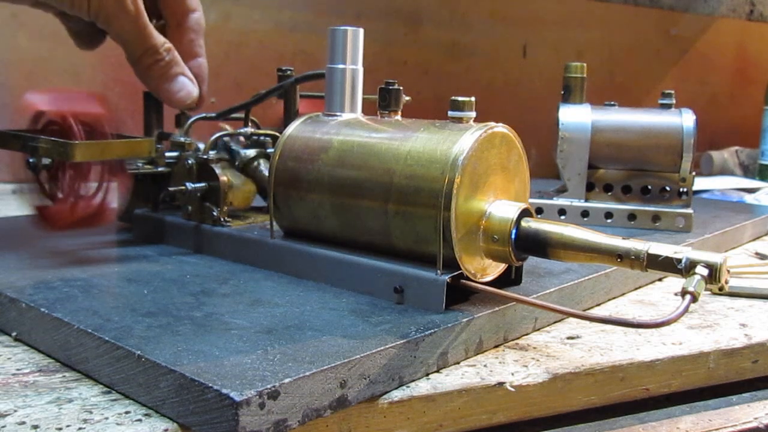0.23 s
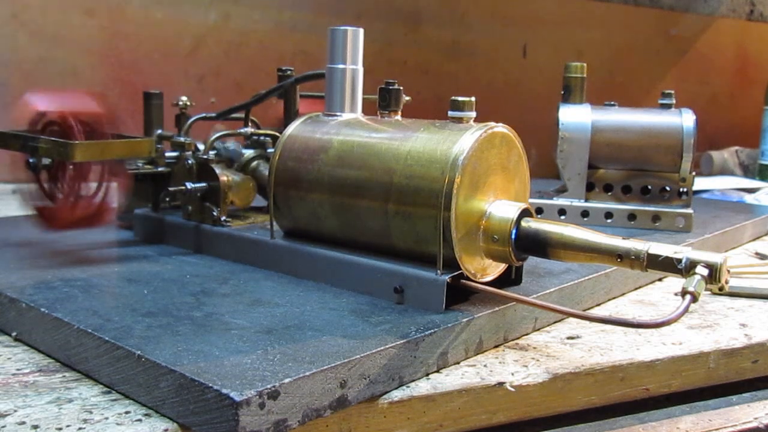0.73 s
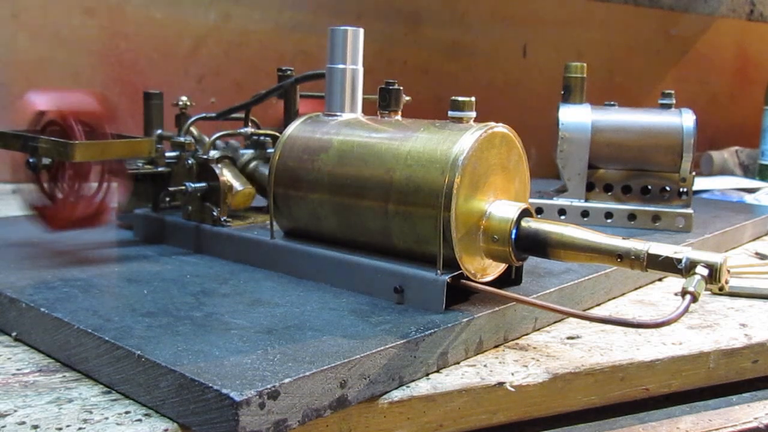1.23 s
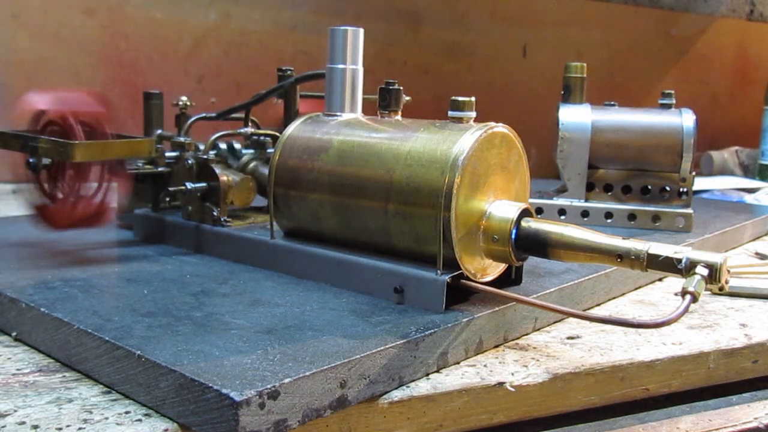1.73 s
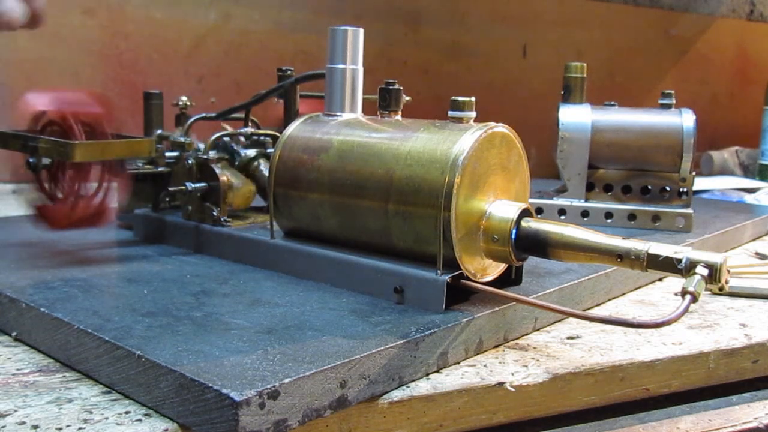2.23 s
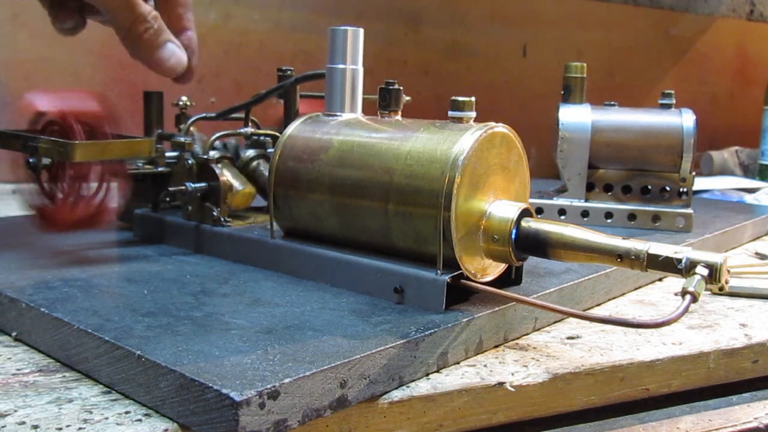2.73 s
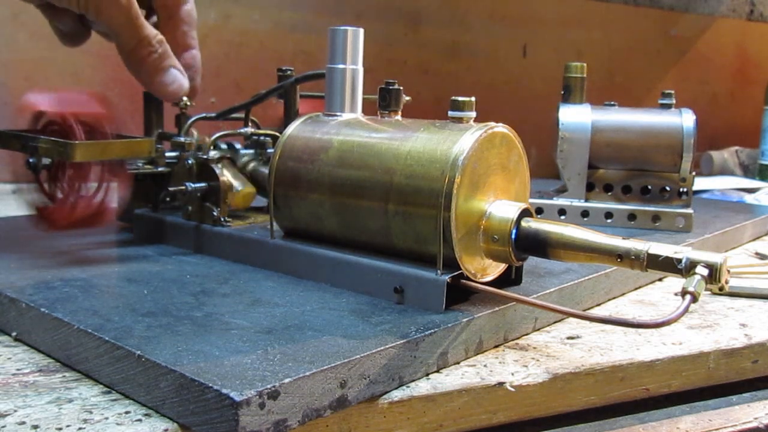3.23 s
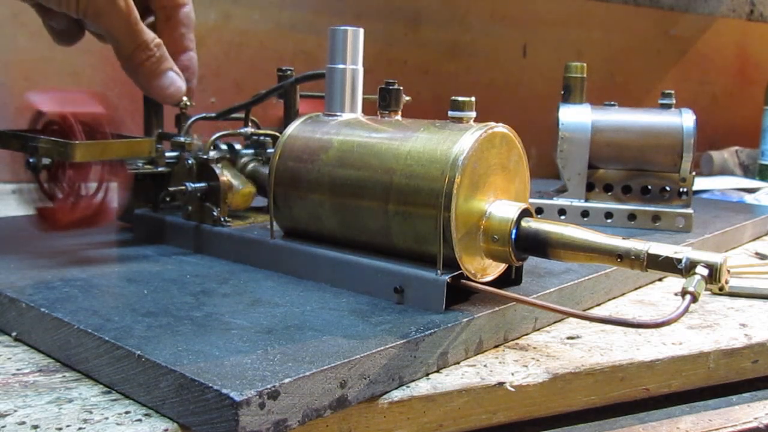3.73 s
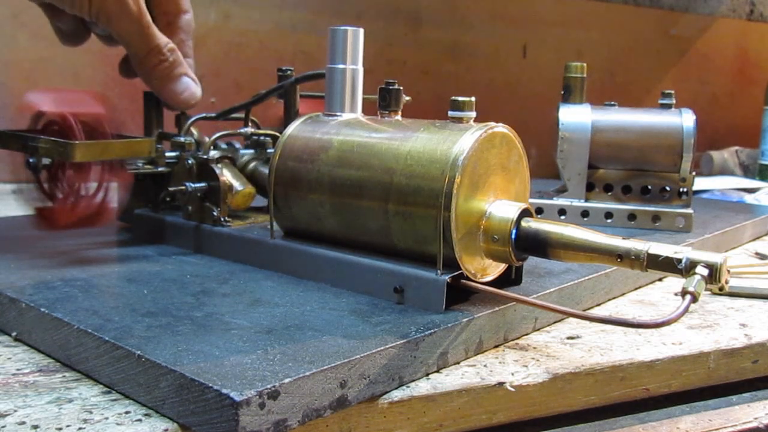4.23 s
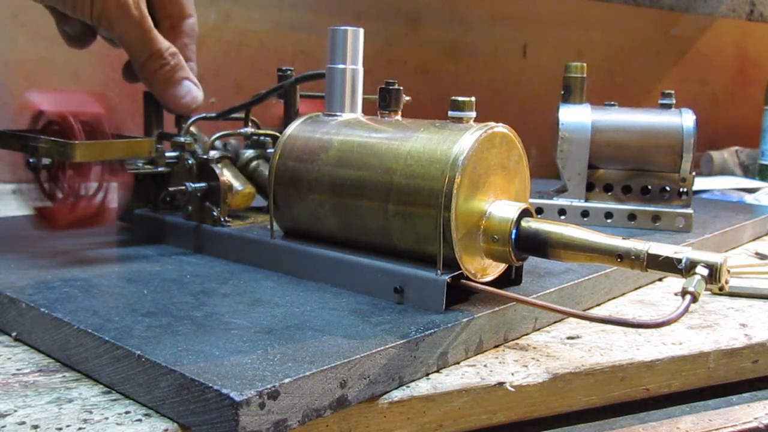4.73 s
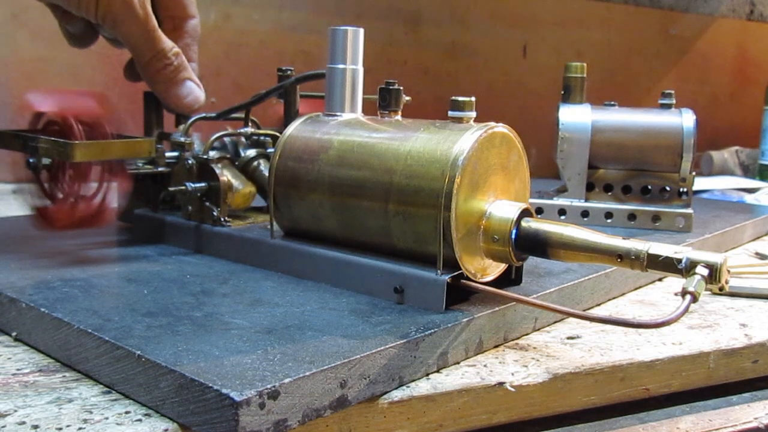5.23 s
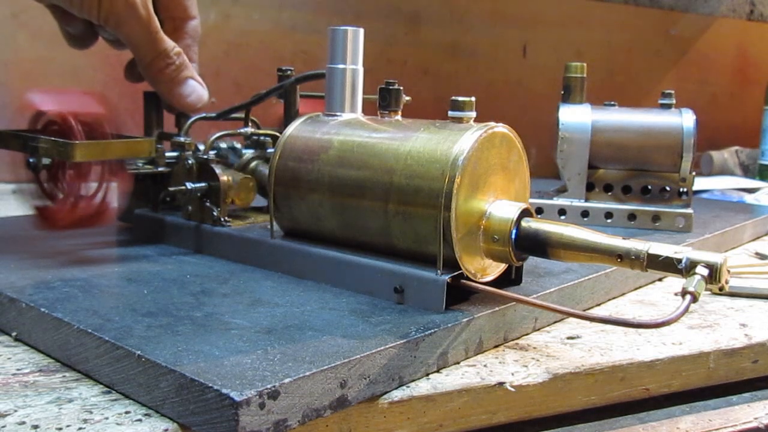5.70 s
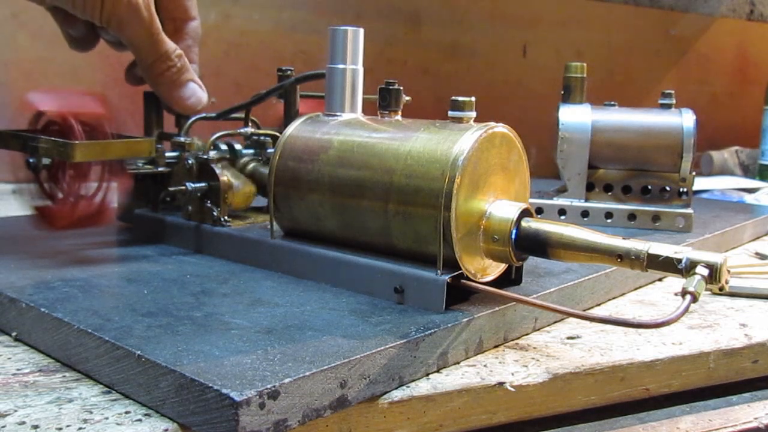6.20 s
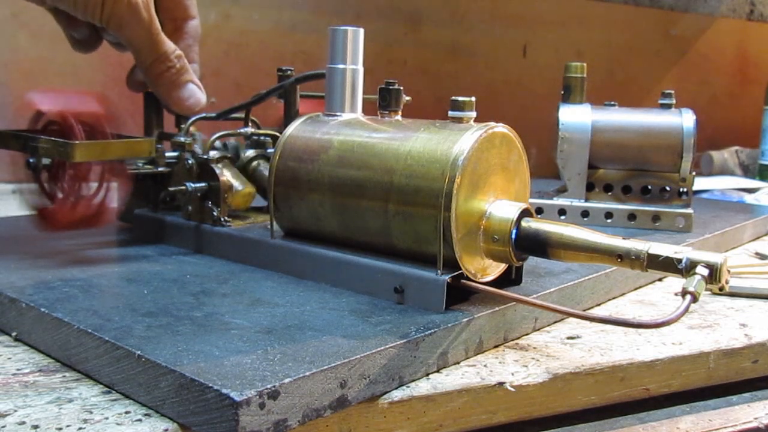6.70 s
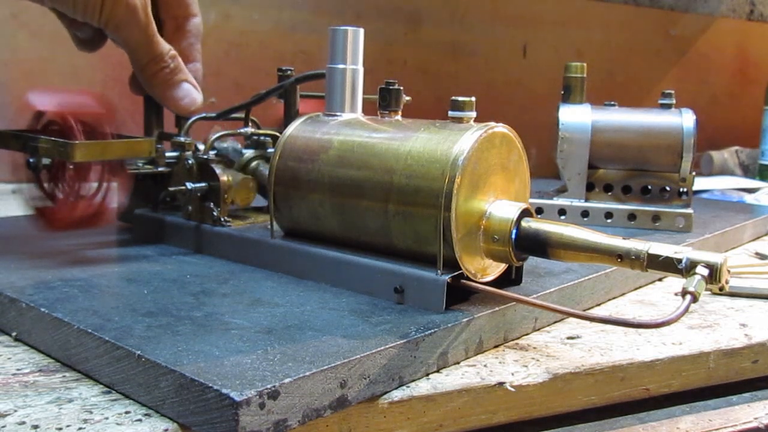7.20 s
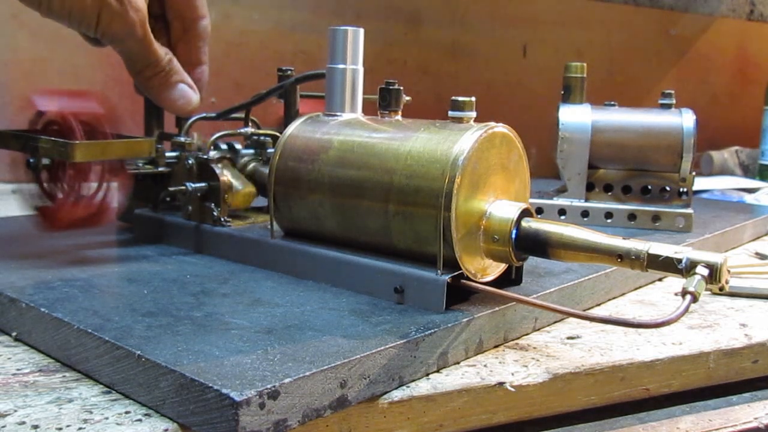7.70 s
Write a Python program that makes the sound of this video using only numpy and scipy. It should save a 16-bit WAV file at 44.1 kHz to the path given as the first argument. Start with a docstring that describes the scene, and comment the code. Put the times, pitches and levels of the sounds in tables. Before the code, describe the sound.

Heard close in a workshop, a gas burner rushes with a faint whistling tone while a miniature steam engine knocks lightly and rapidly. Sharp, high metal ticks soon replace the knocking, and the flame turns suddenly quieter as the microphone level dips. The ticking stays even but slowly loses speed, joined by soft rhythmic steam hiss, a low drone and occasional ringing taps on the metal.

```python
"""A small model steam engine runs on a workbench beside its gas burner. Once a turn a loose metal part
in the gear ticks twice, first lightly and, once the engine is loaded, hard. The linkage knocks, mostly
before the load, and odd taps ring the frame. Steam leaks in time with the crank; the flame roars in its
tube over a low drone of bench and room. The first hard tick trips the microphone's gain control."""
import sys
import numpy as np
from scipy import signal
from scipy.fft import rfft, irfft
from scipy.io import wavfile
from scipy.ndimage import uniform_filter1d

SR = 44100
rng = np.random.default_rng(int(sys.argv[2]) if len(sys.argv) > 2 else 0)


def waveform_to_disk(signal):
    """Save audio, clipped to [-1, 1], as 16-bit WAV at the path in sys.argv[1]."""
    frames = np.transpose(np.atleast_2d(signal))
    scaled = np.clip(frames, -1, 1) * 32767
    samples = np.round(scaled).astype(np.int16)
    wavfile.write(sys.argv[1], SR, samples)


N = 350584

# Each row: time in seconds, crank speed in turns per second.
CRANK_SPEED = [(0, 9.795), (.45, 9.759), (.86, 9.433), (.92, 8.947), (1.26, 8.701), (1.6, 8.62),
               (1.85, 8.802), (2.37, 8.624), (2.37, 8.223), (3.35, 8.491), (3.72, 7.81), (4.14, 7.733),
               (5.54, 7.776), (6.26, 7.379), (6.66, 7.47), (6.77, 7.079), (7.51, 7.346), (7.95, 7.25)]


def crank_turns():
    """Crank angle at every sample; the engine slows under load."""
    start_turns = -.3925
    return start_turns + np.cumsum(curve(CRANK_SPEED, np.arange(N) / SR)) / SR


# Each row: time in seconds, level of the light tick in dB.
LIGHT_TICK_LEVEL = [(0, -22), (.45, -23.5), (.55, -44), (.65, -23), (.8, -22.5), (1.0, -28), (1.5, -20),
                    (2.3, -19.5), (3.0, -20), (3.3, -26), (3.7, -25.5), (5.0, -21.5), (7.05, -26),
                    (7.25, -40), (7.5, -37), (7.7, -23)]
# Extra bounce between the two ticks. Each row: start in seconds, level in dB.
BOUNCES = [(4.9753, -20)]


def loose_part():
    """The part lifts lightly at each whole turn; under load it lands hard, harder at higher speed."""
    landing_turns, loaded_s = .121, .85
    turns, t = crank_turns(), np.arange(N) / SR
    whole = np.arange(int(turns[-1]) + 1)
    lift_scatter, land_scatter = np.clip(rng.standard_normal((len(whole), 2)), -2, 2).T
    lift_s = np.interp(whole, turns, t)
    land_s = np.interp(whole + landing_turns, turns, t)
    lift_db = curve(LIGHT_TICK_LEVEL, lift_s) + 0.5 * lift_scatter
    land_db = -11 + 0.6 * (curve(CRANK_SPEED, land_s) - 8) + 1.64 * land_scatter
    lifts = np.c_[lift_s, lift_db]
    landings = np.c_[land_s, land_db][land_s > loaded_s]
    light = ticks(np.r_[lifts, BOUNCES], tilt_db_per_oct=-34, spread_db=2.2, rise_s=0.0002)
    hard = ticks(landings, tilt_db_per_oct=6.0, spread_db=1.9, rise_s=0.00033)
    return light + hard


# Each row: frequency in Hz, level in dB, T60 in seconds, left minus right in dB.
PART_MODES = [(4380, -16, 0.013, 4.5), (5230, -12, 0.008, 4), (5820, -12, 0.019, 1), (6290, -18, 0.026, 0),
              (7720, -14.5, 0.038, 1.5), (8300, -15.5, 0.019, 1.2), (8970, -12.5, 0.031, 0),
              (9394, 1, 0.0089, 2), (9534, -3, 0.011, 3.5), (11008, 0.5, 0.026, 3.5),
              (11660, -5.5, 0.013, 3), (13060, -9, 0.017, -1.5), (13360, -14, 0.011, 3),
              (14600, -22, .008, 4), (15980, -17, .016, 13)]


def ticks(hits, tilt_db_per_oct, spread_db, rise_s):
    """Each hit rings the part's modes a little differently; the tilt acts above 11 kHz."""
    hz, mode_db, t60_s, pan_db = np.transpose(PART_MODES)
    t, out = np.arange(2500) / SR, np.zeros((2, N))
    scatter = rng.standard_normal((len(hits), 3, len(hz)))
    envelope = gain_of(-60 * t / t60_s[:, None]) * (1 - np.exp(-t / rise_s)) ** 2
    tilt_db = tilt_db_per_oct * np.maximum(np.log2(hz / 11000), 0)
    for (start_s, hit_db), (strength, detune, lag) in zip(hits, scatter):
        level_db = hit_db + mode_db + spread_db * strength + tilt_db
        phase_rad = 2 * np.pi * (hz * (1 + .0015 * detune))[:, None] * t
        # Each mode reaches the two microphone ports out of step.
        lead_rad = np.multiply.outer([.5, -.5], 0.36 + 0.29 * lag)
        rings = envelope * np.sin(phase_rad + lead_rad[:, :, None])
        add(out, start_s, np.einsum("cm,cmt->ct", pan_gains(pan_db) * gain_of(level_db), rings))
    return out


# Each row: start in seconds, level in dB, crack relative to ring in dB.
LINKAGE_HITS = [(.014, -22.5, -10), (.116, -21.5, -6), (.218, -22.5, -6), (0.321, -23.5, -8),
                (0.424, -21, -6), (.526, -22, -12), (.626, -19.5, -12), (0.731, -17.5, -12),
                (0.845, -27, -21), (5.089, -22, -24)]
# Each row: frequency in Hz, width in Hz, level in dB, left minus right in dB.
LINKAGE_MODES = [(1290, 68, -4.5, -4), (1638, 104, 2.5, -1), (2020, 190, -4, -5), (3110, 150, -11, -13),
                 (3490, 85, -11, 9), (4150, 170, -12.5, 8), (5900, 510, -20, 1), (7490, 260, -4, 1)]


def linkage_knocks():
    """The linkage knocks once a turn while the engine runs free, and once more later."""
    return knocks(LINKAGE_HITS, LINKAGE_MODES)


# Each row: start in seconds, level in dB, crack relative to ring in dB.
FRAME_HITS = [(.787, -27, -29), (.828, -31.5, -1.5), (.928, -25.5, -3.5), (2.032, -29, -14.5),
              (2.093, -19, -12), (6.369, -10.5, -16), (7.859, -28, -5), (7.880, -25, -19.5),
              (7.9012, -19, -14), (7.9045, -3, -16)]
# Each row: frequency in Hz, width in Hz, level in dB, left minus right in dB.
FRAME_MODES = [(1250, 250, -12, 6), (1310, 280, 0.5, -12), (2650, 240, -1.5, -4), (4370, 280, -6, 2),
               (5760, 250, -17, -1), (7070, 240, -12, 6), (9750, 240, -4, 1), (11140, 250, -12, -11)]


def frame_taps():
    """Odd taps and clicks ring the frame."""
    return knocks(FRAME_HITS, FRAME_MODES)


def knocks(hits, modes):
    """Each hit rings damped modes under a short bright crack."""
    hz, width_hz, mode_db, pan_db = np.transpose(modes)
    rise_s, crack_t60_s = 0.0005, 0.017
    t, out = np.arange(1500) / SR, np.zeros((2, N))
    rings = np.exp(-np.pi * width_hz[:, None] * t) * np.sin(2 * np.pi * hz[:, None] * t)
    rings *= (1 - np.exp(-t / rise_s)) ** 2
    scatters_db = 3.1 * rng.standard_normal((len(hits), len(hz)))
    bursts = rng.standard_normal((len(hits), 2, len(t))) * gain_of(-60 * t / crack_t60_s)
    cracks = signal.sosfilt(signal.butter(3, [5500, 11500], "band", fs=SR, output="sos"), bursts)
    for (start_s, hit_db, crack_db), scatter_db, crack in zip(hits, scatters_db, cracks):
        body = (pan_gains(pan_db) * gain_of(mode_db + scatter_db)) @ rings
        crack = crack + 2.4 * crack.mean(0)  # mostly common to both channels
        add(out, start_s, gain_of(hit_db) * (body / abs(body).max() + gain_of(crack_db) * crack))
    return out


# Each row: frequency in Hz, relative spectral density in dB.
STEAM_SPECTRUM = [(3000, -18.5), (5000, -9), (8000, -5.5), (10000, -1.5), (10650, 1), (11800, -2),
                  (13000, -8), (14000, -8), (15500, -19), (17000, -25)]
# Each row: crank angle after the light tick in turns, relative leak level in dB.
STEAM_STROKE = [(0, -1), (.12, 2), (.25, -2), (.45, 0.5), (.6, -4), (.72, -31), (.95, -6), (1, -6)]


def steam_leak():
    """A bright leak opens and shuts with the crank, each stroke a little different."""
    def spectrum(hz):
        return gain_of(log_curve(STEAM_SPECTRUM, hz)) * pan_gains(1.0)[:, None]

    turns = crank_turns() + 1
    whole = np.arange(int(turns[-1]) + 2)
    scatter_db = np.interp(turns, whole, 1.8 * rng.standard_normal(len(whole)))
    level_db = -38 + curve(STEAM_STROKE, turns % 1) + scatter_db
    leak = shaped_noise(spectrum, fft_size=256, patch_bins=8, patch_frames=10, patch_db=4.1)
    return gain_of(level_db + 1.7 * flutter(cutoff_hz=200)) * leak


# Steady roar and drone as heard, including sudden dips like a gain being turned down.
# Each row: time in seconds, level in dB.
STEADY_NOISE_LEVEL = [(0, -30), (0.82, -31), (1.0, -28.5), (2.16, -29.5), (2.74, -28), (3.19, -30),
                      (4.35, -30), (5.7, -29), (5.78, -32), (6.07, -31), (6.44, -30), (7.55, -30.5),
                      (7.82, -32.5), (7.95, -34.5)]
# Resonances of the burner tube, then of bench and room.
# Each row: frequency in Hz, width in Hz, relative level in dB, left minus right in dB.
TUBE_MODES = [(1054, 107, -6.5, -0.5), (1147, 70, -8, -1.5), (1224, 42, -5.5, 3.5), (1326, 81, 0.5, -.5),
              (1458, 165, -10, -2.5), (1696, 63, -12, -2), (2346, 220, -14.5, -3), (2627, 77, -9, -6.5),
              (2760, 72, -6, -3.5), (2894, 238, -9, -6), (3130, 340, -20, 4.5), (4410, 210, -22, 4),
              (6050, 150, -15, 2), (7410, 360, -18.5, 0), (8140, 210, -24, 1)]
DRONE_MODES = [(55.7, 11, -22.5, -1), (74.5, 8.6, -22, -3), (112.6, 19, -21, 0.5),
               (183.6, 24.5, -20.5, -0.5), (229, 14, -19, 2.5), (360, 15, -22.5, -2.5),
               (568, 33, -21.5, -1)]
# Broad noise under the resonances. Each row: frequency in Hz, relative level in dB.
ROAR_FLOOR = [(20, -26.5), (60, -30.5), (200, -30.5), (450, -25), (750, -19), (2000, -22), (3800, -28),
              (5200, -28), (9000, -23), (12000, -26), (15000, -43), (17000, -50)]


def burner():
    """Turbulent, fluttering flame noise resonates in the tube, over the drone of bench and room."""
    def spectrum(hz):
        power = gain_of(log_curve(ROAR_FLOOR, hz)) ** 2 * np.ones((2, 1))
        for mode_hz, width_hz, mode_db, pan_db in TUBE_MODES + DRONE_MODES:
            falloff = 1 + (2 * (hz - mode_hz) / width_hz) ** 2 / 1.74
            power += (gain_of(mode_db) * pan_gains(pan_db)[:, None] / falloff) ** 2
        return np.sqrt(power)

    level_db = curve(STEADY_NOISE_LEVEL, np.arange(N) / SR) + 0.78 * flutter(cutoff_hz=56.7)
    roar = shaped_noise(spectrum, fft_size=4096, patch_bins=24, patch_frames=4, patch_db=1.22)
    return gain_of(level_db) * roar


def room_echo(sound):
    """Sparse workshop reflections of random sign die away quickly."""
    size, step, t60_s = SR // 4, 20, 0.066
    grid = np.arange(150, size - step, step)
    delays = grid + rng.integers(0, step, (2, len(grid)))
    response = np.zeros((2, size))
    np.put_along_axis(response, delays, rng.choice([-1., 1.], delays.shape), 1)
    response *= gain_of(-60 * np.arange(size) / SR / t60_s)
    return signal.fftconvolve(sound, response / np.linalg.norm(response[0]), axes=1)[:, :N]


# Each row: frequency in Hz, left-right correlation of the noise.
COHERENCE = [(60, 0.88), (130, 0.8), (290, 0.85), (640, 0.91), (1410, 0.94), (3100, 0.67), (6820, 0.53),
             (15000, 0.63)]


def shaped_noise(spectrum, fft_size, patch_bins, patch_frames, patch_db):
    """Stereo noise at rms 1; time-frequency patches swell and fade at random."""
    hop = fft_size // 4
    frames, hz = N // hop + 5, np.fft.rfftfreq(fft_size, 1 / SR)
    left_re, left_im, other_re, other_im, patches = rng.standard_normal((frames, len(hz), 5)).T
    patches = uniform_filter1d(patches, patch_bins, axis=0)
    patches = unit_rms(uniform_filter1d(patches, patch_frames, axis=1))
    coherence = log_curve(COHERENCE, hz)[:, None]
    left = left_re + 1j * left_im
    right = coherence * left + np.sqrt(1 - coherence ** 2) * (other_re + 1j * other_im)
    spectra = np.array([left, right]) * spectrum(hz)[:, :, None] * gain_of(patch_db * patches)
    return unit_rms(signal.istft(spectra, nperseg=fft_size, noverlap=fft_size - hop)[1][:, :N])


def flutter(cutoff_hz):
    """Low-passed noise at rms 1."""
    rolloff = 1 + (np.fft.rfftfreq(N, 1 / SR) / cutoff_hz) ** 4
    return unit_rms(irfft(rfft(rng.standard_normal(N)) / rolloff, N))


def gain_of(db):
    """Decibels to amplitude."""
    return 10 ** (np.asarray(db) / 20)


def pan_gains(pan_db):
    """Left and right gains for a level difference."""
    return gain_of(np.multiply.outer([.5, -.5], pan_db))


def unit_rms(x):
    """Scales to rms 1."""
    return x / np.sqrt(np.mean(x ** 2) + 1e-20)


def curve(table, x):
    """Interpolates a table linearly."""
    return np.interp(x, *np.transpose(table))


def log_curve(table, hz):
    """Interpolates a table over log frequency."""
    table_hz, values = np.transpose(table)
    return np.interp(np.log(hz + 1), np.log(table_hz + 1), values)


def add(mix, start_s, sound):
    """Adds a stereo sound to the mix."""
    span = mix[:, round(start_s * SR):][:, :sound.shape[1]]
    span += sound[:, :span.shape[1]]


def scene():
    """Ticks and knocks with their echoes, over flame and steam."""
    ticking = loose_part()
    ticking += gain_of(-19) * room_echo(ticking)
    knocking = linkage_knocks() + frame_taps()
    knocking += gain_of(-1) * room_echo(knocking)
    return ticking + knocking + burner() + steam_leak()


def record(dry):
    """The gain starts high and drops for good at the first sharp peak; soft clip, then low-pass."""
    boost_db, trip_rms, fall_samples = 9, .18, 30
    ceiling, cutoff_hz = .9, 15900
    treble_power = uniform_filter1d((np.diff(dry, prepend=0) ** 2).mean(0), size=60)
    tripped = np.maximum.accumulate(treble_power > trip_rms ** 2)
    fall = signal.lfilter([1 / fall_samples], [1, 1 / fall_samples - 1], tripped * 1.)
    boosted = dry * gain_of(boost_db * (1 - fall))
    clipped = ceiling * np.tanh(boosted / ceiling)
    lowpass = signal.firwin(383, cutoff_hz, window=("kaiser", 9), fs=SR)
    return signal.oaconvolve(clipped, lowpass[None], "same")


dry = scene()
out = record(dry)
waveform_to_disk(out)
```